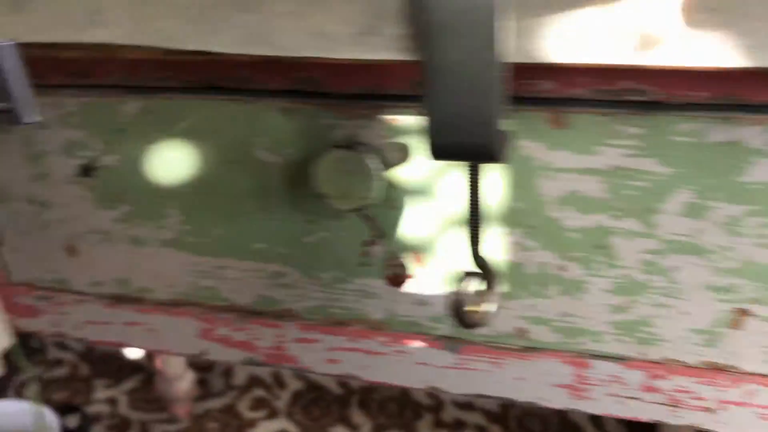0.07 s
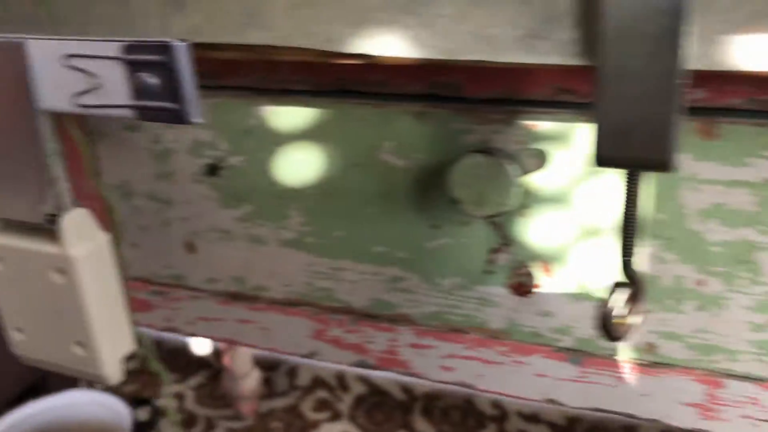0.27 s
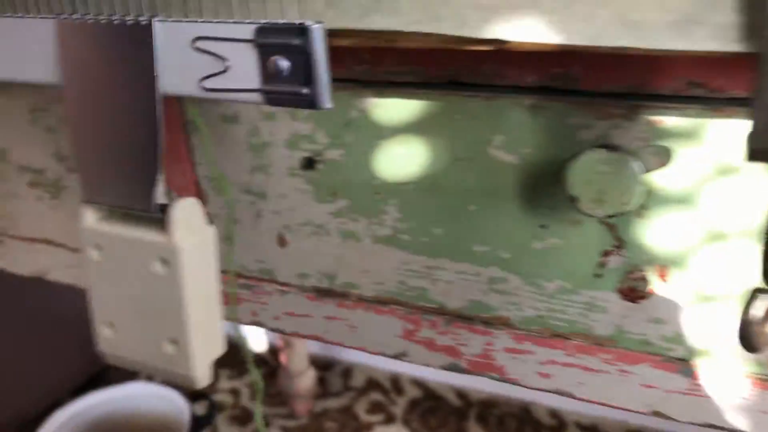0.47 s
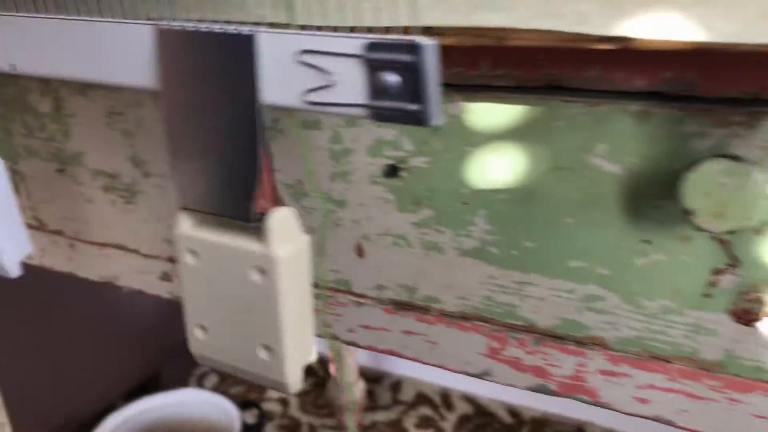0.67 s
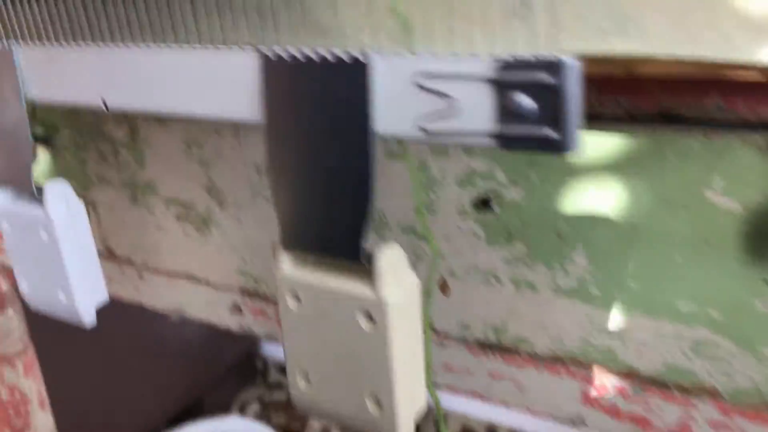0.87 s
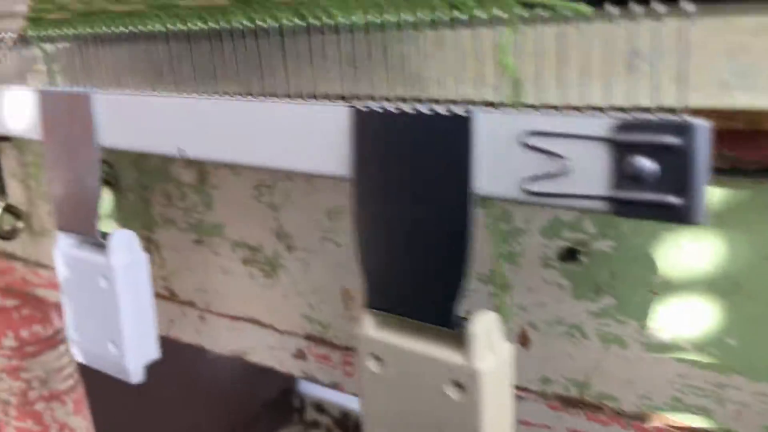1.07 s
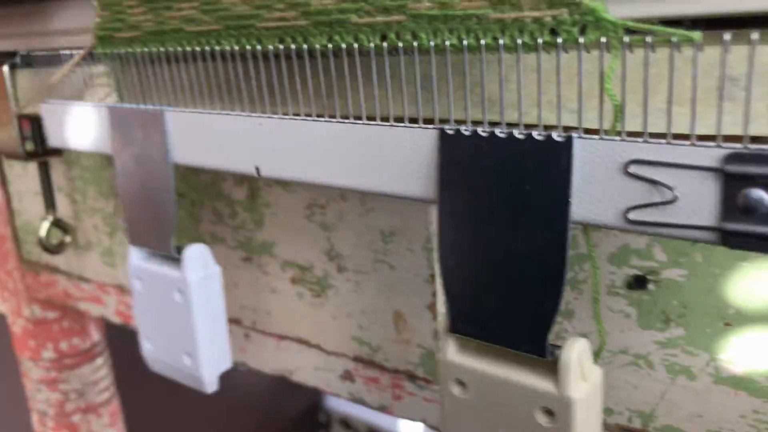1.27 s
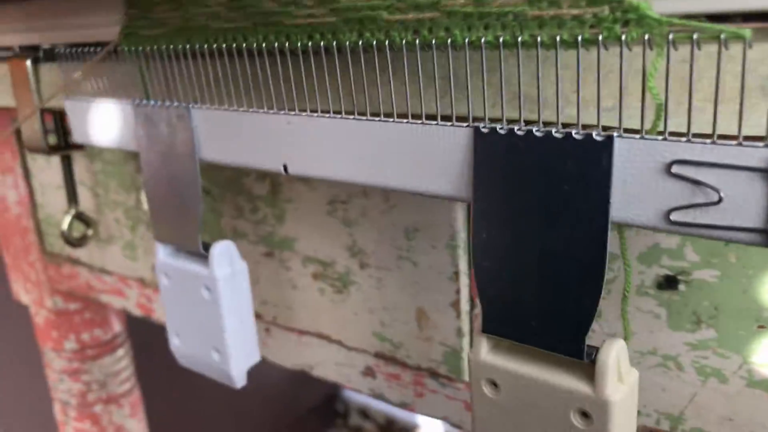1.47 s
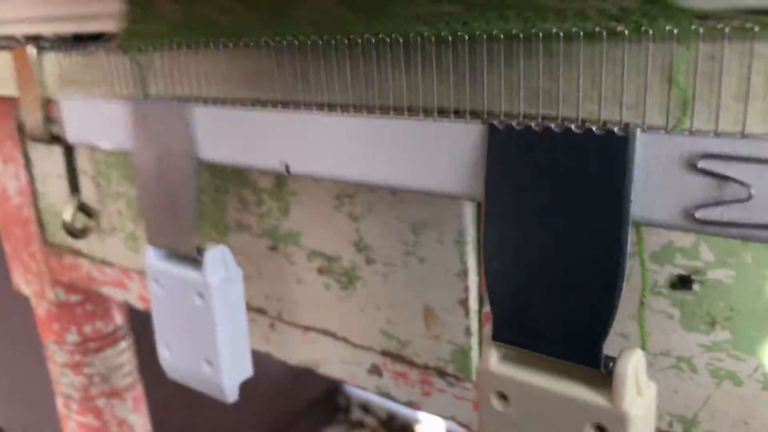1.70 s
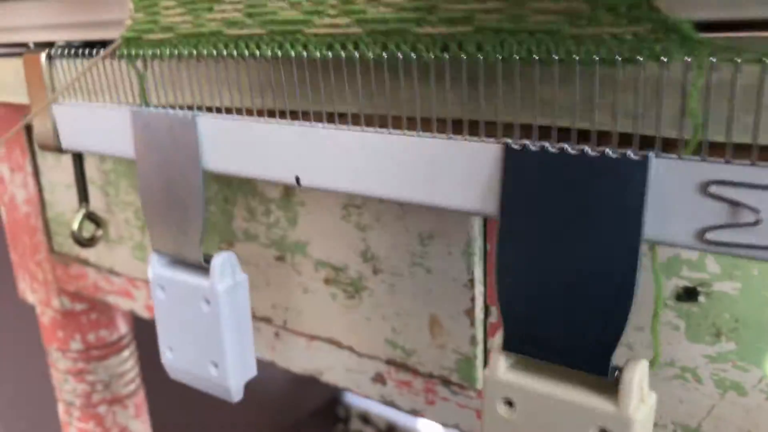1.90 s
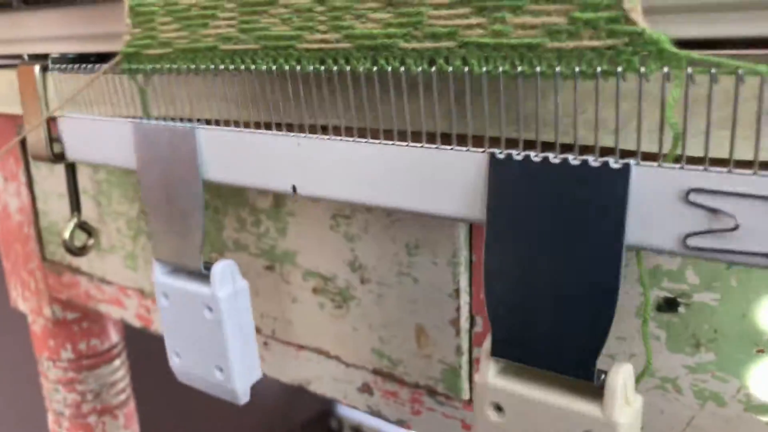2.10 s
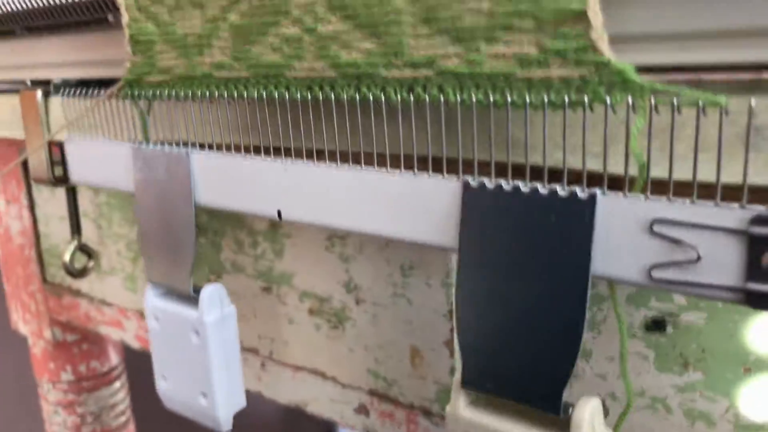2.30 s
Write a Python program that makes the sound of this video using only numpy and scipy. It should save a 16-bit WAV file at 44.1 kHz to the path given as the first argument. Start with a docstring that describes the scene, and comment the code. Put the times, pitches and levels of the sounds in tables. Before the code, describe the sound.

Two close, clattering strokes of a knitting machine carriage over its steel needle bed.

```python
"""Knitting machine, two strokes

A carriage, heard close up, is pushed twice along its needle bed. It slides up to the needles, then
they chatter through its cams, with single clacks as it slows. The impacts excite the high modes of
the steel bed, which rings, and the low modes of the wooden table, which booms.
Faint far-off calls, probably birds, show in the pauses."""
import sys
import numpy as np
from scipy import signal
from scipy.io import wavfile
from scipy.ndimage import uniform_filter1d

SR = 44100
rng = np.random.default_rng(int(sys.argv[2]) if len(sys.argv) > 2 else 0)


def output_pcm(signal):
    """Save a mono or channel-first signal as 16-bit PCM at the path in sys.argv[1].

    Samples are clipped to [-1, 1] before scaling.
    """
    pcm = np.clip(np.atleast_2d(signal).T, -1, 1) * 32767
    wavfile.write(sys.argv[1], SR, np.round(pcm).astype(np.int16))


N = 108045

# needle chatter over each stroke (time [s], relative level [dB])
STROKE_1 = [(.378,-47),(.39,-21.5),(.44,-22),(.52,-19.5),(.57,-18.5),(.64,-20),(.76,-21.5),(.86,-23),(.93,-24.5),(1.01,-26.5),(1.07,-40),(1.14,-47.5)]
STROKE_2 = [(1.55,-44),(1.565,-22),(1.6,-20.5),(1.66,-18.5),(1.75,-21),(1.83,-22.5),(1.89,-23),(1.94,-22),(2.05,-23),(2.14,-23.5),(2.21,-36),(2.29,-53)]
FULL_FORCE_DB = -24.5  # softer impacts are duller and die sooner


def amp(db):
    """Decibels to amplitude ratio."""
    return 10 ** (np.asarray(db) / 20)


def unit(x):
    """Normalisation to rms 1."""
    return x / np.sqrt(np.mean(x ** 2) + 1e-20)


def steady(x, seconds):
    """Normalisation of the short-term rms to 1."""
    return x / np.sqrt(abs(uniform_filter1d(x ** 2, max(int(seconds * SR), 2))) + 1e-9)


def envelope(points):
    """Amplitude along a (time [s], level [dB]) curve, silent outside it."""
    times, db = np.transpose(points)
    return amp(np.interp(np.arange(N) / SR, times, db, left=-120, right=-120))


def at_frequency(points, hz, column=1):
    """Interpolation on a log-frequency axis."""
    rows = np.array(points, float)
    return np.interp(np.log(hz + 1), np.log(rows[:, 0]), rows[:, column])


def colour(x, spectrum, column=1):
    """Spectral shaping by a minimum-phase filter of unit energy."""
    size = 8192
    hz = abs(np.fft.fftfreq(size, 1 / SR))
    log_gain = np.log(amp(at_frequency(spectrum, hz, column)))
    taps = np.fft.ifft(np.exp(np.conj(signal.hilbert(log_gain)))).real[:size // 2]
    return signal.fftconvolve(x, taps / np.linalg.norm(taps))[:N]


def ring(x, modes):
    """Modal superposition: parallel resonators, each with its own peak gain."""
    return sum(amp(db) * signal.lfilter(*signal.iirpeak(hz, hz / width, SR), x)
               for hz, width, db in modes)


def resonate(x, hz, width):
    """Steep resonance at a fixed or moving frequency: two stages, each `width` Hz wide; rms 1."""
    carrier = np.exp(2j * np.pi * np.cumsum(hz * np.ones(N)) / SR)
    pole = np.exp(-np.pi * width / SR)
    stage = [1 - pole], [1, -pole]
    baseband = signal.lfilter(*stage, signal.lfilter(*stage, x / carrier))
    return unit((carrier * baseband).real)


def tone(start, length, hz, harmonics, waver):
    """Soft-edged harmonic tone under slight random frequency modulation."""
    t = np.arange(N) / SR
    drift = unit(uniform_filter1d(uniform_filter1d(rng.standard_normal(N), size=300), size=300))
    phase = 2 * np.pi * np.cumsum(hz * (1 + waver * drift)) / SR
    gate = np.clip(np.minimum(t - start, start + length - t) / 0.0022, 0, 1)
    return gate * sum(amp(db) * np.sin(k * phase) for k, db in harmonics)


def background():
    """Broadband air noise, with nearly periodic far whistles and one lower call."""
    # ambient noise (frequency [Hz], relative level [dB])
    air_spectrum = [(60,-12),(230,-16),(400,-13.5),(700,-16),(1200,-22.5),(2000,-23),(3200,-26),(6000,-31.5),(10000,-42),(16000,-47)]
    # thin whistles (start [s], duration [s], frequency [Hz], level [dB])
    notes = [(-.05,.085,4300,-57),(1.135,.125,4315,-53.5),(2.28,.2,4325,-58)]
    # partials of the call (harmonic number, level [dB])
    partials = [(2,-57),(3,-53.5),(4,-58)]
    whistles = sum(tone(start, length, hz, [(1, db)], waver=0.004) for start, length, hz, db in notes)
    air = amp(-53) * colour(rng.standard_normal(N), air_spectrum)
    call = tone(start=-0.063, length=0.196, hz=531, harmonics=partials, waver=0.011)
    return air + whistles + call


def reverberation(x):
    """Convolution with a short diffuse tail whose treble decays first."""
    # room decay (frequency [Hz], reverberation time [s])
    decay_times = [(150,0.41),(1000,0.48),(4000,0.21),(14000,0.03)]
    hz, t, noise = signal.stft(rng.standard_normal(SR // 2), SR, nperseg=256)
    decay = amp(-60 * t / at_frequency(decay_times, hz)[:, None])
    tail = signal.istft(noise * decay, SR)[1]
    return signal.fftconvolve(x, tail / np.linalg.norm(tail))[:N]


def table_and_shell():
    """Forced vibration: impacts drive the table's modes and the carriage's shell, over a low rumble."""
    # modes of the table (frequency [Hz], bandwidth per stage [Hz], relative gain [dB])
    boom_modes = [(196,11.3,-2),(218.6,27.4,3.5),(324.8,38,-9)]
    lowest_mode = [(137.5,9.1,-7)]
    # envelopes of the boom, lowest mode and rumble (time [s], relative level [dB])
    boom_levels = [(0,-60),(.16,-59),(.2,-47.5),(.35,-44),(.59,-27),(.62,-33),(.8,-36.5),(.85,-35),(.93,-34.5),(1.1,-42),(1.19,-56.5),(1.3,-38),(1.37,-54),(1.47,-35),(1.53,-53),
                   (1.6,-31.5),(1.66,-25.5),(1.685,-34),(1.73,-26),(1.83,-35.5),(1.88,-32),(1.96,-36),(2.015,-24),(2.09,-38.5),(2.15,-31),(2.29,-52),(2.45,-49)]
    lowest_levels = [(0,-77),(.3,-55),(.6,-57),(.68,-43.5),(.9,-39),(1.1,-54),(1.3,-55),(1.45,-52.5),(1.8,-47),(2.05,-44),(2.28,-50),(2.45,-64)]
    rumble_levels = [(0.0, -45), (0.07, -68), (0.27, -55), (0.36, -60), (0.6, -50), (0.84, -59),
                     (0.89, -50), (0.93, -55.5), (1.3, -52.5), (1.49, -51.5), (1.53, -66), (1.59, -52.5),
                     (2.07, -52.5), (2.45, -67)]
    # rumble spectrum (frequency [Hz], relative level [dB])
    rumble_spectrum = [(20,-34),(32,-26),(43,-14),(60,-18.5),(84,-3.5),(105,-26),(150,-33),(400,-53)]
    # shell resonance, shifting along the bed (time [s], frequency [Hz])
    shell_glide = [(.38,334),(.95,340.4),(1.6,295),(1.88,305),(2.14,320)]
    shake = needle_ticks()
    boom = sum(amp(db) * resonate(shake, hz, width) for hz, width, db in boom_modes)
    boom = steady(boom, 0.04) * envelope(boom_levels)
    lowest = steady(ring(ring(shake, lowest_mode), lowest_mode), 0.038) * envelope(lowest_levels)
    shell_hz = np.interp(np.arange(N) / SR, *np.transpose(shell_glide))
    shell = steady(resonate(shake, shell_hz, width=21), 0.1) * (envelope(STROKE_1) + envelope(STROKE_2))
    rumble = steady(colour(rng.standard_normal(N), rumble_spectrum), 0.078) * envelope(rumble_levels)
    return amp(-0.5) * boom + amp(-2) * lowest + amp(-21) * shell + amp(3.5) * rumble


def latch_snaps():
    """Hard contacts of the needle latches: short impacts, rich in high frequencies."""
    snaps_per_s, decay_s = 280, 0.0011
    strikes = amp(-np.minimum(rng.exponential(1, N), 3)) * (rng.random(N) < snaps_per_s / SR)
    decays = signal.lfilter([1], [1, -np.exp(-1 / (decay_s * SR))], strikes)
    bursts = decays * rng.standard_normal(N)
    return unit(signal.sosfilt(signal.butter(1, 5000, "high", fs=SR, output="sos"), bursts))


def needle_ticks():
    """Poisson impacts on the needles passing through the cams, each with its own impulse response."""
    count, in_cams, needles_per_s, hits_per_s = 100, 7, 40, 2400
    tick_s, rattle_s, ping_s = 0.00045, 0.0063, 0.0044  # decay time constants
    hits = rng.choice([-1, 1], N) * (rng.random(N) < hits_per_s / SR)
    position = np.arange(N) / SR * needles_per_s
    struck = (position + rng.random(N) * in_cams).astype(int) % count
    t = np.arange(2048) / SR
    responses, chatter = [], np.zeros(N + len(t))
    for _ in range(count):
        tick = unit(rng.standard_normal(len(t)) * np.exp(-t / tick_s))
        rattle = unit(rng.standard_normal(len(t)) * np.exp(-t / rattle_s))
        mode_hz = rng.uniform(2162, 14000, size=(4, 1))
        ping = unit(np.sin(2 * np.pi * mode_hz * t).sum(0) * np.exp(-t / ping_s))
        responses.append(tick + amp(2.5) * rattle + amp(-3.5) * ping)
    for i in np.flatnonzero(hits):
        chatter[i:i + len(t)] += hits[i] * responses[struck[i]]
    return steady(chatter[:N], 0.087)


def clack_force():
    """Envelope of single clacks, adding in power: quick rise, short hold, exponential decay."""
    # clacks of cams and needles (time [s], relative level [dB], hold [s])
    clacks = [(.028,-44.5,0.023),(.126,-41,.004),(0.15,-36,.0063),(0.171,-29.5,0.018),(.243,-22.5,0.018),(0.299,-33,.008),(.35,-31,.001),(.361,-24,0.0025),(0.385,-24.5,.012),(.415,-21,.002),
              (0.467,-24.5,0.013),(0.533,-28,.0028),(0.572,-23,.007),(.695,-36,.0044),(0.752,-22,0.0046),(0.872,-26,.001),(0.897,-24,0.0098),(0.919,-21,0.015),(.954,-26,0.013),(.989,-24.5,0.0057),(1.015,-26.5,0.0072),(1.04,-30.5,.0094),(1.081,-32.5,.006),(1.088,-32.5,.004),
              (1.161,-46.5,0.0065),(1.201,-46,0.0034),(1.229,-41.5,.003),(1.239,-42.5,.006),(1.271,-37,0.013),(1.293,-35.5,.005),(1.304,-33,0.0083),(1.323,-37.5,.006),(1.347,-30,0.01),(1.361,-28.5,0.0062),(1.444,-21.5,0.0031),(1.528,-28.5,.004),(1.533,-23.5,.002),(1.557,-23.5,0.0095),
              (1.847,-22,0.014),(1.859,-25,.001),(1.916,-24,0.011),(1.943,-25.5,0.0042),(1.992,-24,.014),(2.027,-23.5,0.016),(2.062,-21.5,0.0082),(2.098,-28,0.0052),(2.115,-25.5,0.0065),(2.138,-26,0.018),(2.176,-28,0.019),(2.206,-32,0.02),
              (2.36,-51,.002),(2.403,-44.5,0.0093),(2.422,-50,0.0035)]
    rise_s, light_decay_s, full_decay_s = 0.0011, 0.0075, 0.0097
    t, power = np.arange(N) / SR, np.zeros(N)
    for start, db, hold in clacks:
        age = t - start
        decay_s = light_decay_s + (full_decay_s - light_decay_s) * min(amp(db - FULL_FORCE_DB), 1)
        rise = np.clip(age / rise_s, 0, 1)
        fall = np.exp(-np.maximum(age - hold, 0) / decay_s)
        power += (amp(db) * rise * fall) ** 2
    return np.sqrt(power)


def carriage():
    """Impact excitation: harder contacts sound brighter, and the steel bed rings at its modes."""
    # sliding on the rail before each stroke (time [s], relative level [dB])
    slide_1 = [(.12,-49.5),(.165,-39.5),(.19,-33.5),(.23,-30),(.275,-24.5),(.295,-32.5),(.34,-39),(.385,-30.5)]
    slide_2 = [(1.34,-47),(1.384,-36.5),(1.392,-30),(1.43,-26),(1.47,-25),(1.508,-33.5),(1.555,-34.5)]
    # relative spectra of the metal (frequency [Hz], first slide [dB], first stroke [dB],
    # second slide and stroke [dB], clacks [dB])
    spectra = [(60,-16,-27,-21,-28),(164,1,-4.5,-14,3),(527,2,-3.5,-1,-2.5),(774,-0.5,-1.5,-3.5,-2.5),(1063,13.5,7,2,3),(1380,-10,3,4,-1),(1520,5.5,-1,-2,2),(2300,-3,0,-1.5,-3.5),(2820,4,-0.5,-1.5,2),(3050,-4.5,0.5,0,-2.5),(3450,-1.5,-0.5,-1.5,-1.5),(4580,-1,-0.5,-2,-0.5),
               (4700,-2,-5,-6.5,-2.5),(6160,-0.5,-1.5,-2,-3),(7300,0.5,-4,-5,-3),(8700,-14,-3.5,-0.5,-1),(9700,-1.5,-3,-0.5,-3),(10330,-5,-7.5,-8,-7.5),(11980,-1,-4.5,-2,-2.5),(12800,-7,-0.5,-3.5,-3.5),(14800,-3,-5,-5.5,-8.5),(18000,-15,-5,-16.5,-6.5)]
    # modes of the steel bed (frequency [Hz], bandwidth [Hz], peak gain [dB])
    bed_modes = [(1106,46,-4),(1250,22,-15),(2640,15,-14),(3460,57,-5),(5280,70,-8),(6020,80,-8),(9900,23,-9),(13700,27,-4)]
    # pings of the carriage's metal parts (start [s], duration [s], frequency [Hz], level [dB])
    notes = [(0.157,0.011,2830,-46),(0.17,0.021,1087,-30.5),(0.17,0.034,2794,-39.5),(.218,0.016,1740,-39),(0.305,0.015,1714,-31),(0.36,.014,1700,-36),(1.02,0.049,8500,-42),(1.237,.04,2500,-54),(1.951,0.012,11900,-17.5),(2.404,0.021,1860,-53)]
    treble_hz, treble_slope = 6360, 0.65  # slope in dB of treble per dB of force
    forces = [envelope(slide_1), envelope(STROKE_1),
              envelope(slide_2) + envelope(STROKE_2), clack_force()]
    total_force = np.sqrt(sum(force ** 2 for force in forces))
    impacts = steady(needle_ticks() + amp(-9.5) * latch_snaps(), 0.015)
    dull = signal.sosfiltfilt(signal.butter(1, treble_hz, fs=SR, output="sos"), impacts)
    brightness = (total_force / amp(FULL_FORCE_DB)) ** treble_slope
    impacts = dull + (impacts - dull) * brightness
    # each spectrum is weighted by its force's share of the power
    metal = sum(colour(impacts * force ** 2 / total_force, spectra, column)
                for column, force in enumerate(forces, start=1))
    pings = sum(tone(start, length, hz, [(1, db)], waver=0.0082) for start, length, hz, db in notes)
    return amp(0.26) * metal + ring(metal, bed_modes) + pings


def scene():
    """Superposition of direct sound, reverberation and background, the same in both channels."""
    machine = carriage() + table_and_shell()
    return np.tile(machine + amp(-14) * reverberation(machine) + background(), (2, 1))


def record(dry):
    """Band limiting: a steep bass cut and a linear-phase low-pass."""
    low_hz, high_hz = 37, 15850
    dry = signal.sosfilt(signal.butter(6, low_hz, "high", fs=SR, output="sos"), dry)
    low_pass = signal.firwin(401, high_hz, window=("kaiser", 8), fs=SR)
    return signal.oaconvolve(dry, low_pass[None], "same")


dry = scene()
out = record(dry)
output_pcm(out)
```